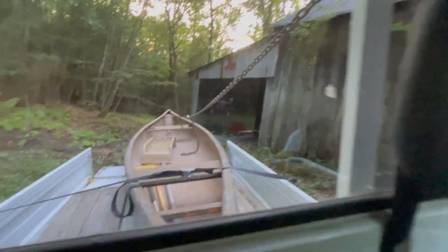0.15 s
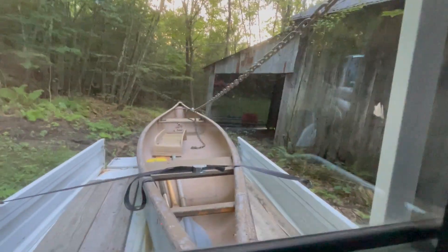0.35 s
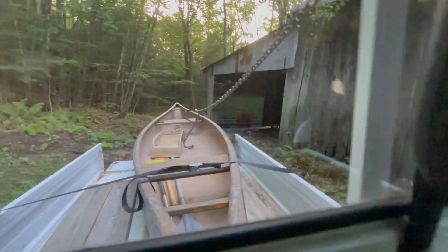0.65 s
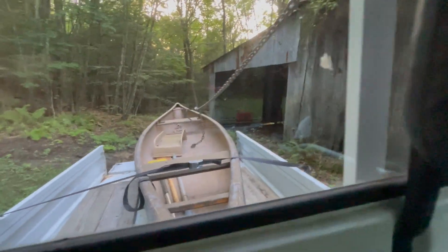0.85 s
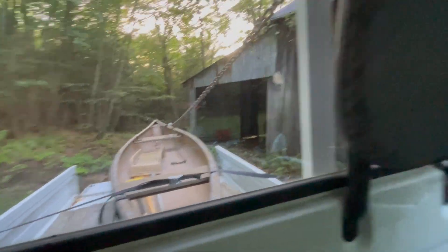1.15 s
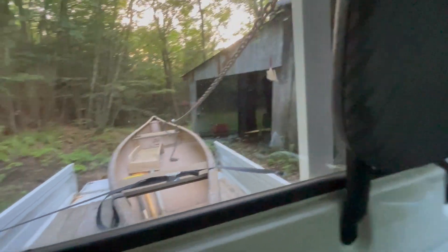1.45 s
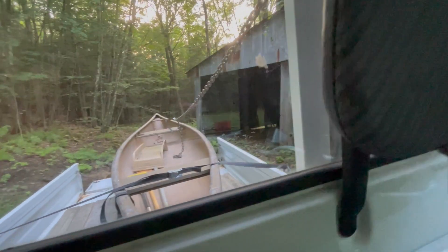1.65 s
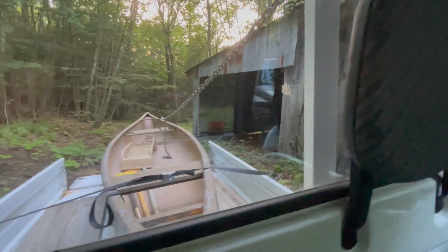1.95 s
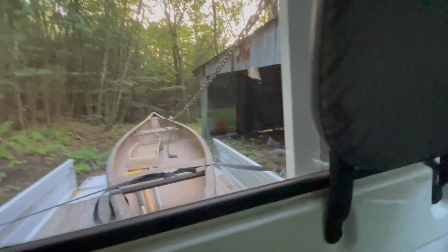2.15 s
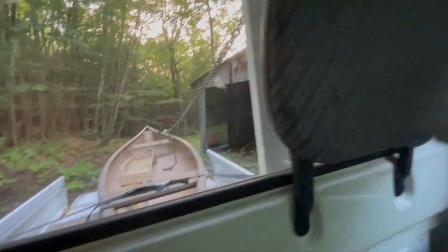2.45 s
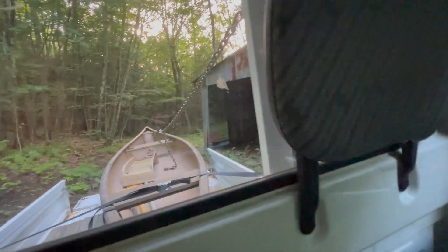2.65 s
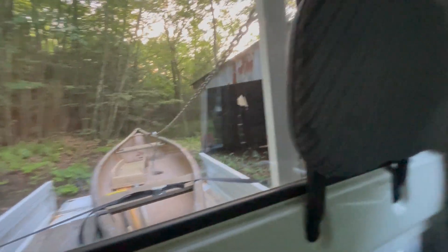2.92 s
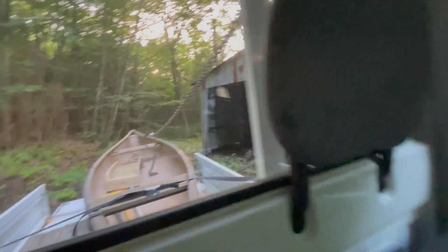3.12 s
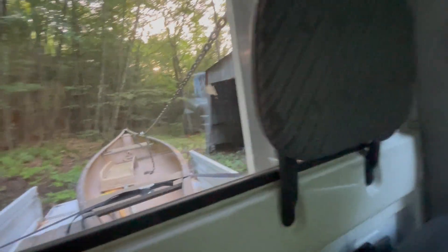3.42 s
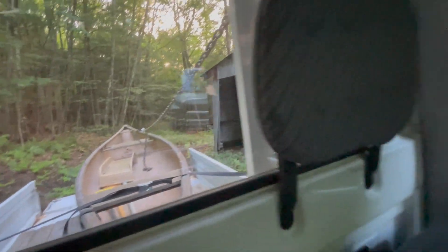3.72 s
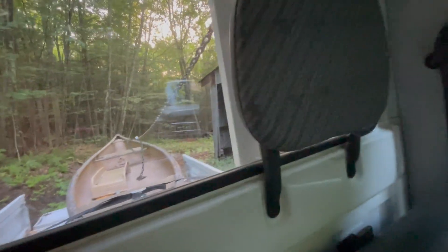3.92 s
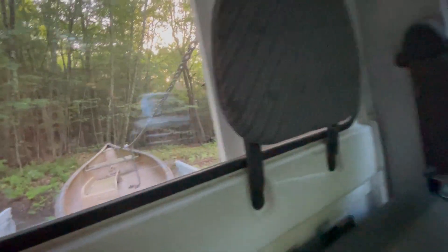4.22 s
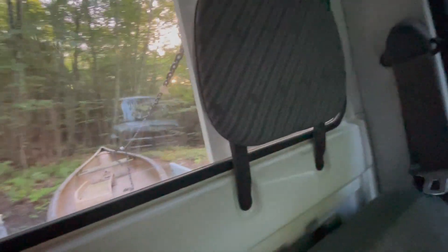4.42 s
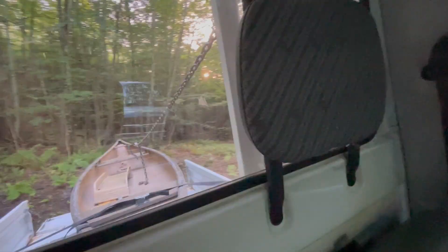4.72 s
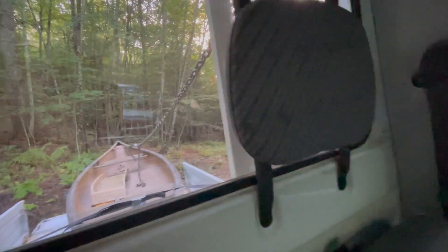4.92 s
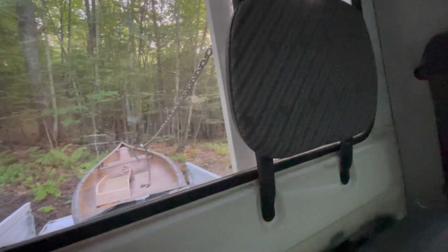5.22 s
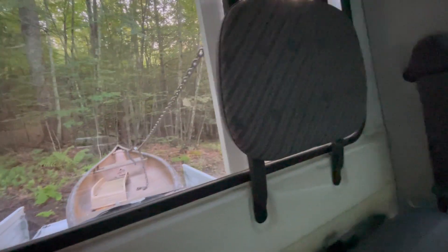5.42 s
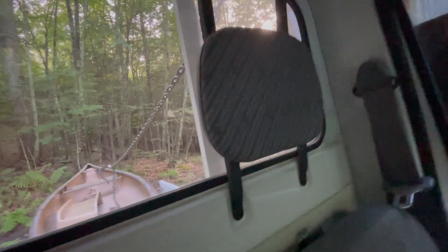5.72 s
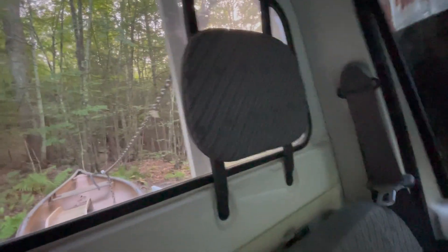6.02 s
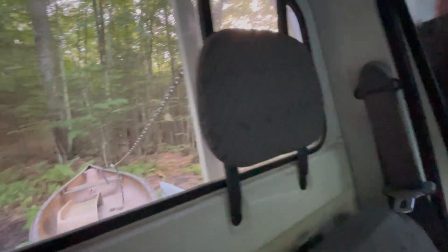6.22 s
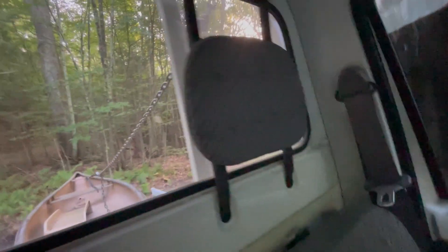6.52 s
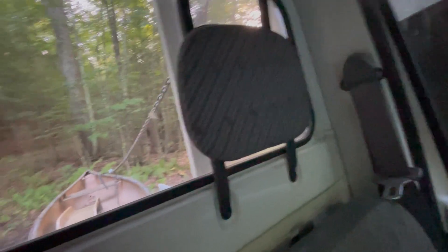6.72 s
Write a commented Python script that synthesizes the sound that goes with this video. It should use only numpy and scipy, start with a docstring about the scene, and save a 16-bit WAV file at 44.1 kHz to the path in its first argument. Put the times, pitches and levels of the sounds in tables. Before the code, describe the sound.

Inside a small truck cab, a low engine throbs unevenly, slowing and surging, while a strapped load knocks, rattles and squeaks over bumpy woodland ground.

```python
"""A jolt rumbles and rattles, then an engine throbs near idle and repeatedly speeds up and slows down.
We sit in the cab of a small three-cylinder truck creeping backwards on a bumpy dirt trail, a boat on its bed.
The engine, squeaks and bumps are sine tones; knocks and clinks are dying groups of them, knocks with noise.
Shaped noise makes the rumble, rattle, litter under the tyres, rubbing, twigs and panel buzz."""
import sys
import numpy as np
from scipy import signal
from scipy.fft import rfft, irfft, next_fast_len
from scipy.io import wavfile
from scipy.ndimage import map_coordinates

SR = 44100
rng = np.random.default_rng(int(sys.argv[2]) if len(sys.argv) > 2 else 0)


def to_wav(s):
    """Save 16-bit WAV."""
    ch = np.atleast_2d(s).T  # columns
    pcm = np.round(np.clip(ch, -1, 1) * 32767)  # PCM
    wavfile.write(sys.argv[1], SR, pcm.astype(np.int16))


N = 302947  # length of the scene in samples

# How fast the cylinders fire: (time [s], firing rate [firings per second])
ENGINE_SPEED = [(0.0, 31.5), (0.35, 28.8), (0.62, 25), (0.8, 25.8), (1.02, 20.6), (1.17, 24), (1.3, 26.6),
                (1.8, 29.8), (2.2, 25.2), (2.6, 21.6), (2.87, 21), (3.05, 31.5), (3.19, 36.1), (3.4, 30),
                (3.6, 28.3), (3.8, 27.3), (3.97, 35.6), (4.12, 40.2), (4.26, 46.2), (4.38, 48.2),
                (4.53, 45.7), (4.7, 40.9), (5.06, 37.6), (5.4, 35.4), (5.65, 36.4), (5.88, 42),
                (6.02, 43.2), (6.25, 38.6), (6.55, 27), (6.87, 23.5)]


def firing():
    """Running phase of the firings [radians], which strays most when the engine turns slowly."""
    hz, = curves(ENGINE_SPEED)
    return cycle(hz) + (3 / hz) ** 1.4 * wobble(14)


# Loudness of the firing tone before a small lift: (time [s], level [dB])
THROB_LEVEL = [(0.0, -44.5), (0.5, -32.5), (1.0, -38), (1.32, -31), (1.5, -36), (2.2, -39), (2.6, -56),
               (2.98, -38), (3.21, -20.5), (3.4, -31), (3.78, -28), (4.14, -12), (4.27, -21), (4.5, -39.5),
               (4.68, -29), (5.2, -26), (5.6, -20.5), (5.8, -14), (6.0, -14.5), (6.25, -25), (6.48, -37.5),
               (6.87, -40)]
# Loudness of its octave when the engine pulls: (time [s], level [dB])
PULL_LEVEL = [(0.0, -49), (0.48, -41), (0.78, -27), (1.14, -18), (1.2, -29), (1.36, -18.5), (1.48, -40.5),
              (2.1, -36), (2.25, -24.5), (2.7, -30), (3.12, -29), (3.55, -34), (3.92, -24.5), (4.1, -27),
              (4.27, -23.5), (4.5, -40), (4.75, -51), (5.12, -35), (5.48, -26), (5.75, -35), (5.9, -22.5),
              (6.25, -43), (6.48, -38), (6.54, -26.5), (6.75, -52), (6.83, -25), (6.87, -22)]
# Loudness of the engine's upper tones before a trim: (time [s], level [dB])
GROWL_LEVEL = [(0.0, -41), (0.48, -36), (0.73, -27), (1.09, -36), (1.28, -28.5), (1.8, -37.5), (2.4, -30),
               (2.75, -26), (2.92, -33), (3.1, -30.5), (3.5, -32.5), (3.9, -23.5), (4.15, -33.5),
               (4.4, -31.5), (4.73, -39.5), (5.15, -34.5), (5.5, -30), (5.9, -28), (6.1, -40), (6.7, -34.5),
               (6.87, -36)]
# Strength of 3 to 10 times the firing rate, before the cab colours them: (level [dB])
FIRING_ORDER_LEVELS = [0, -7, -6, -9.5, -7.5, -16, -9, -10]
# Strength of 4/3, 5/3, 7/3 and 8/3 of the firing rate, before the cab colours them: (level [dB])
UNEVEN_ORDER_LEVELS = [-14, -9, -2, -17.5]
CYLINDERS = 3
ENGINE_LAG_S = 0.00064  # the engine reaches the left microphone later
GROWL_GAIN_DB, GROWL_WAVER_DB = -0.5, 1.0  # trim; depth of its random swelling


def engine(phase):
    """Firing throbs, its octave booms, upper orders chug; unequal cylinders add weak tones between."""
    hz, throb_db, pull_db, growl_db = curves(ENGINE_SPEED) + curves(THROB_LEVEL) + curves(PULL_LEVEL) + curves(GROWL_LEVEL)
    left_right_shift = np.pi * hz * ENGINE_LAG_S * np.array([[-1], [1]])
    phase = phase + left_right_shift
    between = [k / CYLINDERS for k in (4, 5, 7, 8)]
    upper = list(enumerate(FIRING_ORDER_LEVELS, start=3)) + list(zip(between, UNEVEN_ORDER_LEVELS))
    throb = amp(throb_db + 1.4) * orders(phase, hz, [(0.99, 0)], waver_db=-0.5)
    pull = amp(pull_db) * orders(phase, hz, [(2, 0)], waver_db=1.14)
    growl = amp(growl_db + GROWL_GAIN_DB) * orders(phase, hz, upper, waver_db=0.94)
    low_swell = amp(0.64 * wobble(36))
    growl_swell = amp(GROWL_WAVER_DB * wobble(32))
    return low_swell * (throb + pull) + growl_swell * growl


# How the cab's resonances colour the engine's upper tones: (frequency [Hz], level [dB])
CAB_BOOM = [(45, -35), (55, -7), (63, 0.5), (70, -2), (77, -2), (86, -0.5), (102, -8), (116, -4.5),
            (128, -6.5), (145, -5), (170, -14.5), (198, -18.5), (215, -9.5), (232, -16.5), (280, -16)]
PULSE_SMEAR = 0.35  # radians by which the orders stray from one sharp firing pulse


def orders(phase, hz, rows, waver_db):
    """Engine orders (multiple, dB), coloured by the cab and each swelling on its own; rms near 1."""
    tone, power = 0, 0
    for k, db in rows:
        gain = amp(db + along(CAB_BOOM, k * hz))
        swell = amp(waver_db * np.sqrt(k) * wobble(11))
        tone = tone + gain * swell * np.cos(k * phase + PULSE_SMEAR * rng.standard_normal())
        power = power + gain ** 2 / 2
    return tone / np.sqrt(power)


# Tone colour of the chassis rumble: (frequency [Hz], level [dB per Hz])
RUMBLE_COLOUR = [(25, -36), (45, 1.5), (65, -1), (100, 0.5), (135, 0), (180, -11), (250, -11), (290, -16),
                 (350, -12), (450, -14), (600, -25.5), (1200, -72)]
# Resonances of the cab: (frequency [Hz], width [Hz], level [dB])
CAB_RESONANCES = [(215.1, 5.4, 3), (354.3, 30, -11.5), (576, 19, -18)]
# Tone colour of the rattling load: (frequency [Hz], level [dB per Hz])
RATTLE_COLOUR = [(250, -6.5), (430, -13.5), (620, 4.5), (850, -2.5), (1100, -3.5), (1400, -5.5), (1700, -8),
                 (2100, -17), (3200, -21), (5000, -34.5), (10000, -62)]
# Tone colour of leaves and grit: (frequency [Hz], level [dB per Hz])
CRUNCH_COLOUR = [(700, 4.5), (2000, 4), (3200, 0.5), (5000, -2), (7000, -2), (9000, -0.5), (11000, -7),
                 (13000, -29.5), (15500, -6.5)]


def ride():
    """Ruts shake the chassis and ring the cab, the load chatters, leaves and grit crunch."""
    rumble_db, rattle_db, crunch_db = shaking()

    def cab(f):
        return sum(amp(db) * 1j * f * w / (c * c - f * f + 1j * f * w) for c, w, db in CAB_RESONANCES)

    rumble = spread(contacts(110, 1.35, 0.27, 0.81), lambda f: amp(along(RUMBLE_COLOUR, f)))
    cab_ring = spread(contacts(60, 4.0, 0.095, 0.29), cab)
    out = amp(rumble_db + 6.0) * rumble + amp(rumble_db - 4.0) * cab_ring
    for part in range(4):  # four layers swell separately, each with its own resonances
        chatter = spread(contacts(70, 4.7, 0.2, 0.057),
                         lambda f: amp(along(RATTLE_COLOUR, f)) * ripple(f, step_hz=29.97, depth_db=7.5))
        litter = spread(contacts(56, 15.0, 0.045, 2.8),
                        lambda f: amp(along(CRUNCH_COLOUR, f)) * ripple(f, step_hz=46.32, depth_db=5.0))
        out += amp(rattle_db - 2.5 + 4.77 * wobble(13)) * chatter
        out += amp(crunch_db - 4.5 + 3.82 * wobble(9.7)) * litter
    return out


# Jolts from ruts and roots, before the ride's own trims:
# (time [s], length [s], chassis rumble level [dB], load rattle level [dB])
JOLT_EVENTS = [(0, 0.096, -35.5, -45.5), (0.492, 0.12, -36, -52.5), (0.748, 0.15, -39, -50.5),
               (0.941, 0.065, -32.5, -48), (1.127, 0.094, -39, -48), (1.247, 0.058, -34, -56),
               (1.596, 0.021, -34, -56), (1.919, 0.19, -44, -53.5), (2.288, 0.095, -37, -46.5),
               (2.407, 0.066, -33.5, -48.5), (2.774, 0.17, -37.5, -53), (3.104, 0.14, -41.5, -48.5),
               (3.628, 0.23, -40.5, -55.5), (3.774, 0.19, -33, -45.5), (4.032, 0.13, -36.5, -51),
               (4.239, 0.17, -35.5, -44), (4.565, 0.1, -41.5, -48.5), (5.254, 0.024, -40, -76),
               (5.62, 0.27, -39.5, -55.5), (6.123, 0.031, -43.5, -64), (6.77, 0.059, -34.5, -43.5)]
# Leaves and grit under the tyres, before trims: (time [s], level [dB])
LITTER_LEVEL = [(0.0, -51.5), (0.32, -58.5), (0.78, -55.5), (1.45, -59), (2.6, -55), (3.16, -54.5),
                (3.44, -61.5), (4.59, -51.5), (5.0, -53.5), (5.39, -59), (5.78, -53.5), (6.87, -61.5)]
JOLT_ATTACK_S, JOLT_FALL_DB_PER_S = 0.018, 77
ROLL_RUMBLE_DB, ROLL_RATTLE_DB = -48, -58  # on smooth ground
SHAKE_RUMBLE_DB = -33  # shaken by the engine, against its loudness
LITTER_GAIN_DB, JOLT_CRUNCH_DB = -0.5, -21  # steady crunch; extra crunch against a jolt's rattle


def shaking():
    """Rumble, rattle and crunch in dB: rolling, engine shake, litter and jolts add their power."""
    t = np.arange(N) / SR
    loud_db = np.maximum(*curves(THROB_LEVEL), *curves(PULL_LEVEL))
    litter_db, = curves(LITTER_LEVEL)
    rumble = amp(ROLL_RUMBLE_DB) ** 2 + amp(loud_db + SHAKE_RUMBLE_DB) ** 2
    rattle = np.full(N, amp(ROLL_RATTLE_DB) ** 2)
    crunch = amp(litter_db + LITTER_GAIN_DB) ** 2
    for s, length, rumble_db, rattle_db in JOLT_EVENTS:
        fall = amp(-JOLT_FALL_DB_PER_S * np.maximum(t - s - length, 0))
        jolt = np.clip((t - s) / JOLT_ATTACK_S, 0, 1) * fall
        rumble += (amp(rumble_db) * jolt) ** 2
        rattle += (amp(rattle_db) * jolt) ** 2
        crunch += (amp(rattle_db + JOLT_CRUNCH_DB) * jolt) ** 2
    return 10 * np.log10([rumble, rattle, crunch])


# Ways the hull and steel bed ring: (frequency [Hz], level [dB], time to fall 60 dB [s])
HULL_MODES = [(341.5, -1, 0.22), (428, 0, 0.14), (566, 3, 0.24), (687, 6.5, 0.044), (854, -11, 0.082),
              (973, -1.5, 0.099), (1163, 0, 0.067), (1358, -9, 0.15), (1580, 2.5, 0.14), (1754, -2, 0.061),
              (1960, 0, 0.081), (2110, -3, 0.078), (2300, 7, 0.13), (2580, 4, 0.095), (3440, 12, 0.065),
              (5600, -20, .05)]
# Knocks of the load, before a trim:
# (time [s], level [dB], pitch of the contact [Hz], clatter against the ring [ratio])
KNOCK_EVENTS = [(.083, -28, 420, 0.42), (.348, -36, 1300, 0.65), (.949, -23.5, 670, 1.1),
                (.962, -26, 1030, 0.31), (.973, -15.5, 347, 0.12), (.975, -21.5, 612, 0.24),
                (.992, -26, 586, 0.23), (1.265, -27, 970, 1.06), (1.466, -35, 1630, 1.06),
                (1.611, -31.5, 700, 1.3), (1.629, -25, 350, 0.45), (2.312, -29.5, 1540, 0.75),
                (2.346, -32, 1560, 0.42), (2.401, -27, 1400, .9), (2.425, -25, 380, 0.6),
                (2.487, -29.5, 1030, 0.76), (2.79, -36, 477, 0.49), (2.87, -32, 1090, 1),
                (3.247, -32, 1139, 1.4), (3.545, -37, 1850, .9), (3.546, -34, 750, 1.1),
                (3.705, -37, 950, 1.1), (3.822, -24, 380, .6), (3.89, -26, 710, 1), (3.954, -24, 900, 0.33),
                (4.052, -24.5, 470, 0.95), (4.276, -30.5, 1360, 0.7), (4.394, -25.5, 1120, 1.04),
                (4.579, -14.5, 690, 0.18), (4.6, -25, 870, 0.2), (4.616, -23, 870, 0.18),
                (4.633, -30.5, 970, .15), (5.872, -26, 804, 1.03), (6.326, -34.5, 690, 1.06),
                (6.484, -28.5, 431.9, 1.15), (6.492, -22, 690, 1), (6.497, -25.5, 1170, 0.47),
                (6.522, -19, 697, 0.73), (6.782, -21, 600, 0.64), (6.785, -26, 1741, 0.94),
                (6.791, -26, 576, .05), (6.82, -22.5, 576, .05), (6.835, -17.5, 1180, 0.43),
                (6.834, -34, 2293, 0.15), (6.835, -19.5, 580, .05), (6.839, -35, 3500, .1)]
KNOCK_ATTACK_S = 0.001


def knocks():
    """A blow rings the hull modes near its contact pitch; a loose one rings more modes and clatters."""
    out, t = np.zeros((2, N)), np.arange(SR // 3) / SR
    hz, level, t60 = np.transpose(HULL_MODES)[:, :, None]
    for s, db, pitch, share in KNOCK_EVENTS:
        nearness = hump(hz, pitch, 0.048 + 0.23 * abs(share))
        strength = amp(level + rng.normal(0, 0.74, (2, len(hz), 1))) * nearness
        phase = rng.uniform(0, 2 * np.pi, hz.shape) + rng.normal(0, 1.0, strength.shape)
        modes = strength * amp(-60 * t / t60) * np.sin(2 * np.pi * hz * t + phase)
        ring = modes.sum(1) / np.sqrt(np.sum(strength ** 2) / 4)
        colour = lambda f: amp(along(RATTLE_COLOUR, f)) * hump(f, pitch, 2.0) * ripple(f, step_hz=70.5, depth_db=4.5)
        clatter = spread(rng.standard_normal((2, len(t))), colour) * amp(-60 * t / 0.22)
        attack = 1 - np.exp(-t / KNOCK_ATTACK_S)
        add(out, s, amp(db - 10.0) * (ring + share * clatter) * attack)
    return out


# Soft bumps of the suspension, before a lift: (time [s], level [dB], pitch [Hz])
BUMP_EVENTS = [(0.783, -8, 53), (0.774, -17.5, 164.5), (3.822, -10, 65), (3.904, -5.5, 62.5),
               (5.288, -16.5, 114), (6.799, -19, 59)]


def bumps():
    """A wheel drops into a rut: a few low cycles through the springs."""
    out, t = np.zeros((2, N)), np.arange(SR // 3) / SR
    envelope = amp(-60 * t / 0.11) * (1 - np.exp(-t / 0.0081))
    for s, db, hz in BUMP_EVENTS:
        add(out, s, amp(db + 3.0) * np.sin(2 * np.pi * hz * t) * envelope)
    return out


# Squeaks of the hull under its straps, before trims:
# (time [s], length [s], pitch [Hz], glide [octaves], tone level [dB], octave level [dB])
SQUEAK_EVENTS = [(.62, 0.037, 880, -0.049, -46, -52), (.655, 0.038, 870, 0.021, -44, -49),
                 (.738, .022, 830, 0.074, -44, -37.5), (1.083, 0.035, 883, 0.11, -52, -49),
                 (4.688, 0.013, 2510, 0.65, -39, -60), (4.758, .016, 818, 0, -42, -58),
                 (4.789, 0.014, 825, 0.07, -45, -54), (4.812, 0.017, 825, 0, -49, -55),
                 (4.855, 0.031, 813, -0.097, -37, -57), (4.89, .016, 828, 0.053, -40, -60),
                 (4.908, 0.041, 750, .2, -41.5, -54), (6.524, 0.029, 1365, -0.052, -28, -52)]
SQUEAK_ROUGH = 0.37  # radians of phase jitter as the contact catches and slips
SQUEAK_ATTACK_S, SQUEAK_T60_S = 0.005, 0.067  # rise time; time to fall 60 dB


def squeaks():
    """The strap slips: a short gliding tone with its octave, rough-edged, dying away quickly."""
    out, t = np.zeros((2, N)), np.arange(SR // 8) / SR
    for s, length, hz, glide, tone_db, octave_db in SQUEAK_EVENTS:
        pitch = hz * 2 ** (glide * (np.clip(t / length, 0, 1) - 0.5))
        phase = cycle(pitch) + SQUEAK_ROUGH * wobble(400)[:len(t)]
        phase = phase + rng.normal(0, 0.74, (2, 1))  # left and right differ
        fall = amp(-60 * np.maximum(t - length / 2, 0) / SQUEAK_T60_S)
        slip = np.clip(t / SQUEAK_ATTACK_S, 0, 1) * fall
        tones = amp(tone_db - 2.0) * np.sin(phase) + amp(octave_db + 0.5) * np.sin(2 * phase)
        add(out, s, slip * tones)
    return out


# Chafing of the load and broader scrapes of brush, before trims:
# (time [s], length [s], centre [Hz], width [octaves], level [dB])
RUB_EVENTS = [(0, 0.093, 2980, 1, -51), (0.112, 0.026, 2780, 0.13, -38.5), (0.125, 0.039, 4900, 0.22, -47),
              (0.887, 0.033, 2730, 0.17, -44.5), (1.923, 0.086, 1750, 0.89, -48.5),
              (2.267, 0.16, 1420, 0.19, -41), (2.27, 0.17, 2780, 0.65, -45.5),
              (2.843, 0.12, 4660, 0.36, -47), (2.961, 0.13, 5500, 0.97, -50),
              (2.981, 0.17, 1380, 0.28, -48.5), (3.196, 0.067, 2950, 0.3, -47),
              (4.242, 0.31, 1350, 0.35, -44.5), (4.598, 0.31, 2760, 0.49, -52),
              (4.577, 0.047, 2580, 0.06, -48), (4.594, 0.079, 1590, 0.16, -45),
              (4.675, 0.084, 1100, 0.51, -39.5), (4.74, 0.23, 1100, 0.21, -48.5),
              (4.677, 0.3, 816, 0.09, -47.5), (5.552, 0.5, 790, 0.36, -46), (6.216, 0.27, 790, 0.18, -44.5),
              (6.58, 0.12, 465, 0.54, -41)]
CHAFE_DB, GRIT_DB = -1, 1.5  # depth of the chafing; of its irregular catching


def rubs():
    """Rubbing surfaces sing briefly in an unsteady band, chafing in time with the engine's shake."""
    out = np.zeros((2, N))
    for s, length, hz, width, db in RUB_EVENTS:
        n = int(max(length, 0.005) * SR)
        tone = spread(rng.standard_normal((2, SR // 3)), lambda f: hump(f, hz, width))[:, :n]
        add(out, s, amp(db + 3.5) * unit(tone) * np.hanning(tone.shape[1]))
    shake = np.cos(cycle(curves(ENGINE_SPEED)[0]))
    return out * amp(CHAFE_DB * shake + GRIT_DB * wobble(260) - 3.0)


# Tone colour of a breaking twig: (frequency [Hz], level [dB per Hz])
TWIG_COLOUR = [(300, -8), (1200, 13.5), (2300, 4.5), (3500, 4.5), (5500, -0.5), (8000, 1), (11000, -5),
               (15500, -36)]
# Twigs snapping and striking the cab, before a trim: (time [s], level [dB], centre [Hz])
SNAP_EVENTS = [(0.492, -26.5, 8050), (1.157, -33, 2820), (1.263, -31, 6950), (1.799, -40.5, 2250),
               (2.039, -41.5, 1890), (2.067, -41, 5630), (2.255, -37.5, 2220), (2.344, -42, 4500),
               (2.899, -35.5, 4900), (3.543, -41, 2480), (3.754, -41, 3520), (3.943, -40.5, 2550),
               (4.657, -49, 9000), (6.328, -48, 5000), (6.521, -45, 2800)]
SNAP_T60_S = 0.1  # time for the crack to fall 60 dB


def snaps():
    """A dry, broad crack of noise with a fainter, slower tail."""
    out, t = np.zeros((2, N)), np.arange(SR // 3) / SR
    fall = amp(-60 * t / SNAP_T60_S) + amp(-4.5 - 60 * t / 0.17)
    attack = 1 - np.exp(-t / 0.0017)
    for s, db, centre in SNAP_EVENTS:
        colour = lambda f: amp(along(TWIG_COLOUR, f)) * hump(f, centre, 2.04) * ripple(f, step_hz=170, depth_db=2.8)
        crack = spread(rng.standard_normal((2, len(t))), colour)
        add(out, s, amp(db - 5) * crack * fall * attack)
    return out


# Clinks of a small hanging steel ring, before a trim: (time [s], level [dB])
CLINK_EVENTS = [(.497, -35), (.56, -33.5), (.975, -47), (1.08, -43), (1.6, -50), (2.07, -48), (3.24, -39),
                (3.8, -49)]
# Ways the steel ring sounds: (frequency [Hz], level [dB], time to fall 60 dB [s])
RING_MODES = [(6560, 1, 0.94), (8400, 2, 1), (15100, 15, 0.6), (15450, 3, 0.41)]


def clinks():
    """A light piece of steel rings, thin, high and unsteady."""
    out, t = np.zeros((2, N)), np.arange(SR // 2) / SR
    for s, db in CLINK_EVENTS:
        drift = np.cumsum(rng.standard_normal((2, len(t))), axis=1) * 0.09  # radians
        ring = 0
        for hz, level, t60 in RING_MODES:
            phase = 2 * np.pi * hz * t + drift + rng.uniform(0, 2 * np.pi)
            ring = ring + amp(level - 60 * t / t60) * np.sin(phase)
        add(out, s, amp(db - 27.0) * ring * (1 - np.exp(-t / 0.0027)))
    return out


# Tone colour of the buzzing cab panels: (frequency [Hz], level [dB per Hz])
BUZZ_COLOUR = [(150, -22), (350, -2), (560, 0), (850, 3), (1500, -4.5), (2200, -15.5), (4200, -18),
               (11000, -46)]
BUZZ_DB, BUZZ_FOLLOWS = -34.5, 0.96  # level at 0 dB of throb; dB of buzz per dB of throb
BUZZ_PULSE_DB = 1.5  # its swing with each firing


def buzz(phase):
    """The engine's shake keeps the cab panels buzzing, with a push at each firing."""
    throb_db, = curves(THROB_LEVEL)
    colour = lambda f: amp(along(BUZZ_COLOUR, f)) * ripple(f, step_hz=40.0, depth_db=5)
    noise = spread(contacts(300, 1.5, 0.028, 0.75), colour)
    return amp(BUZZ_DB + BUZZ_FOLLOWS * throb_db + BUZZ_PULSE_DB * np.cos(phase)) * noise


def contacts(rate, scatter_db, t60, bed):
    """Random contacts (rate a second), each a dying burst of noise, on an even bed of noise."""
    sizes = (rng.random(N) < rate / SR) * amp(scatter_db * np.clip(rng.standard_normal(N), -2, 2))
    dying = amp(-120 * np.arange(SR // 4) / SR / t60)  # in power, so 60 dB down after t60
    power = np.abs(signal.fftconvolve(sizes ** 2, dying)[:N])
    return np.sqrt(power / power.mean() + abs(bed)) * rng.standard_normal((2, N))


def ripple(hz, step_hz, depth_db):
    """Crowded panel modes and close reflections make a finely peaked response."""
    knots = np.arange(0, SR / 2 + step_hz, step_hz)
    heights = np.clip(rng.standard_normal(4096), -2, 2)
    return amp(depth_db * np.interp(hz, knots, np.resize(heights, len(knots))))


# How alike left and right are, held between -1 and 1: (frequency [Hz], likeness [ratio])
LEFT_RIGHT_LIKENESS = [(50, 3.5), (125, 0.6), (250, 0.8), (500, -0.24), (1000, -0.23), (4000, 0), (9000, 0),
                       (13000, 0.1)]


def spread(pair, gain):
    """Colour two unrelated signals and mix them into the cab's left and right, rms 1."""
    turn = lambda hz: np.arccos(np.clip(along(LEFT_RIGHT_LIKENESS, hz), -1, 1)) / 2
    mid, side = filtered(pair, lambda hz: gain(hz) * np.array([np.cos(turn(hz)), np.sin(turn(hz))]))
    return unit(np.array([mid + side, mid - side]))


def amp(db):
    """Decibels to gain."""
    return 10 ** (np.asarray(db) / 20)


def unit(x):
    """Scale to rms 1."""
    return x / np.sqrt(np.mean(x ** 2) + 1e-20)


def along(points, hz):
    """Read (Hz, value) points on a log axis."""
    f, v = np.transpose(points)
    return np.interp(np.log(hz + 1), np.log(f + 1), v)


def curves(rows):
    """One value per sample for each column after the time."""
    s, *cols = np.transpose(rows)
    return [np.interp(np.arange(N) / SR, s, c) for c in cols]


def wobble(rate):
    """A smooth random curve, rate knots a second."""
    knots = rng.standard_normal(int(N * rate / SR) + 4)
    return map_coordinates(knots, [np.arange(N) * rate / SR], order=2)


def cycle(hz):
    """Running phase of a frequency curve."""
    return 2 * np.pi * np.cumsum(hz) / SR


def filtered(x, response):
    """Shape x by a response given over frequency."""
    n = x.shape[-1]
    m = next_fast_len(n + 8192)  # padding keeps the end from wrapping onto the start
    return irfft(rfft(x, m) * response(np.fft.rfftfreq(m, 1 / SR)), m)[..., :n]


def hump(hz, centre, octaves):
    """A bell on the log-frequency axis."""
    return 1 / (1 + (np.log2((hz + 1) / centre) / octaves) ** 2)


def add(track, s, sound):
    """Mix a sound into the track at time s."""
    start = max(round(s * SR), 0)
    part = track[:, start:start + sound.shape[-1]]
    part += sound[..., :part.shape[1]]


def scene():
    """Add up all the sources; engine and panel buzz share the same firings."""
    phase = firing()
    truck = engine(phase) + ride()
    load = knocks() + bumps() + squeaks() + rubs()
    return truck + load + snaps() + clinks() + buzz(phase)


# How the two microphones differ: (frequency [Hz], left minus right [dB])
LEFT_RIGHT_LEAN = [(60, .5), (125, 1.8), (250, 1.6), (500, -2.1), (1000, -1.3), (2000, -1.3), (4000, -4),
                   (8000, -2), (13000, 0)]
TOP_HZ = 15800  # nothing passes above this


def record(dry):
    """The two microphones hear the cab a little differently, and nothing above the band limit."""
    def microphones(hz):
        half_db = along(LEFT_RIGHT_LEAN, hz) / 2
        return amp(np.array([half_db, -half_db])) * (hz < TOP_HZ)

    return filtered(dry, microphones)


dry = scene()
out = record(dry)
to_wav(out)
```